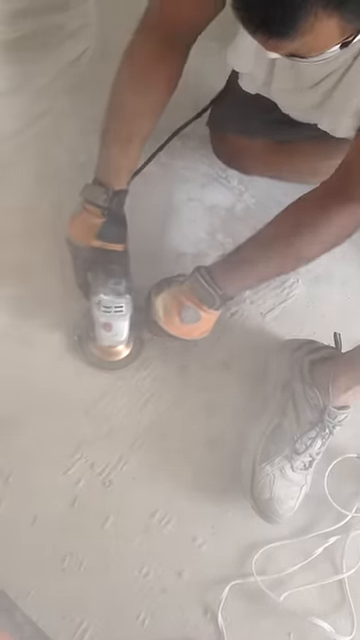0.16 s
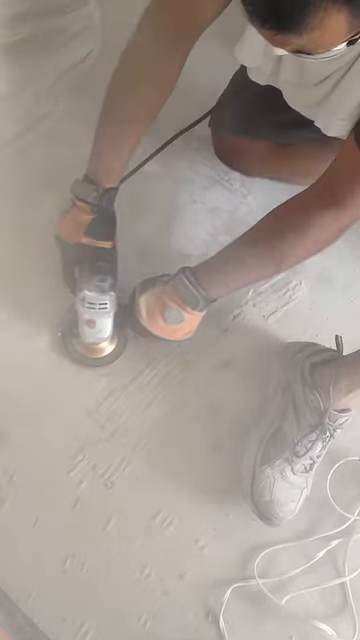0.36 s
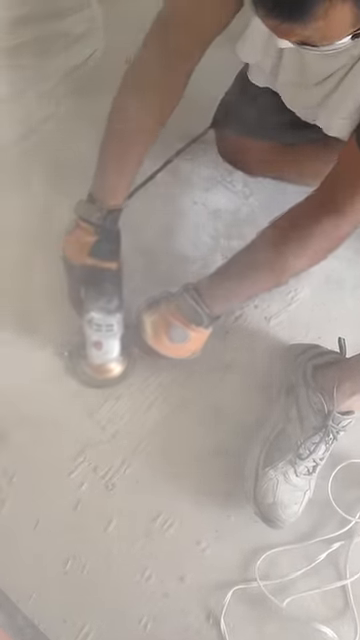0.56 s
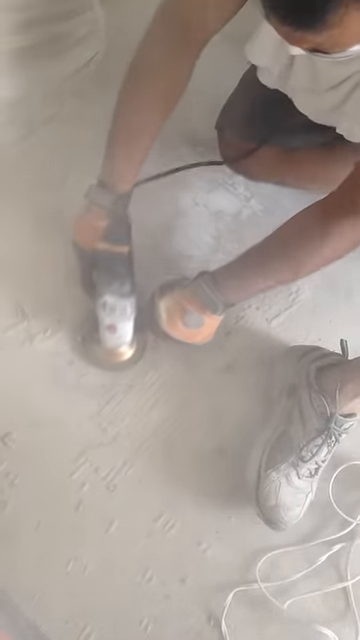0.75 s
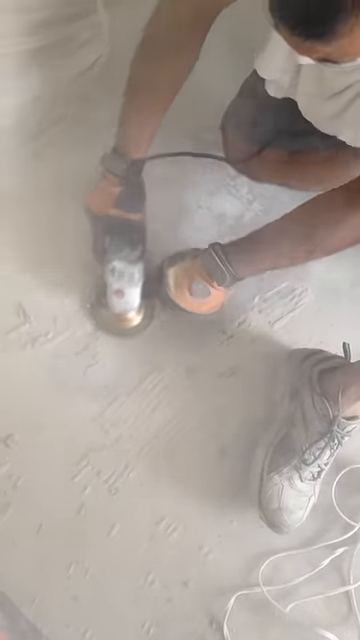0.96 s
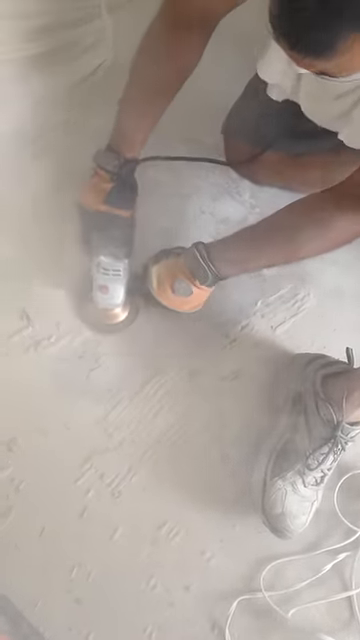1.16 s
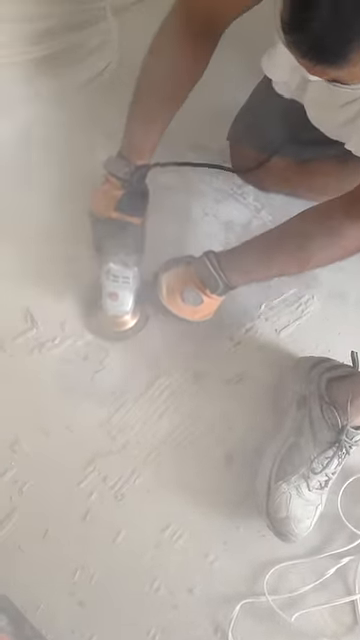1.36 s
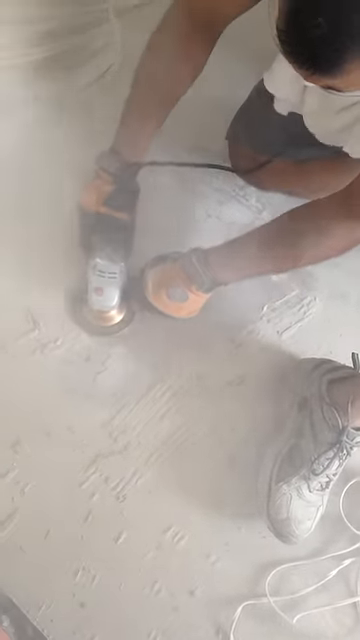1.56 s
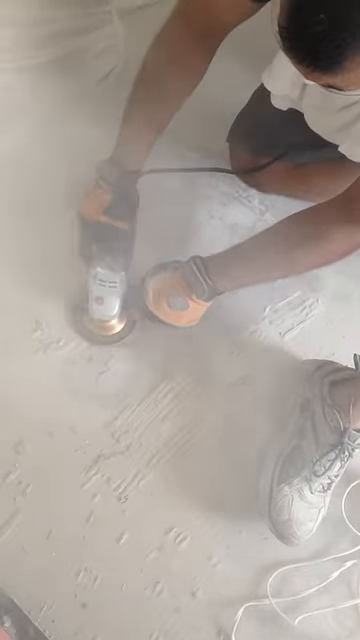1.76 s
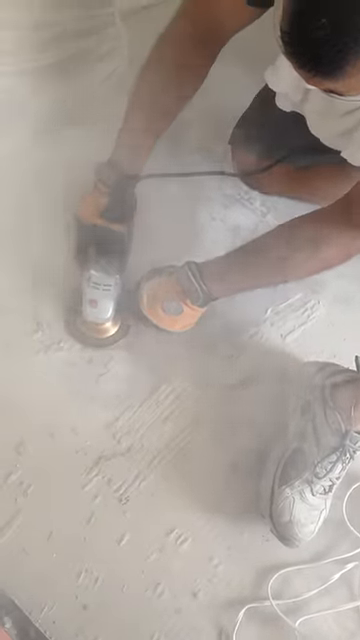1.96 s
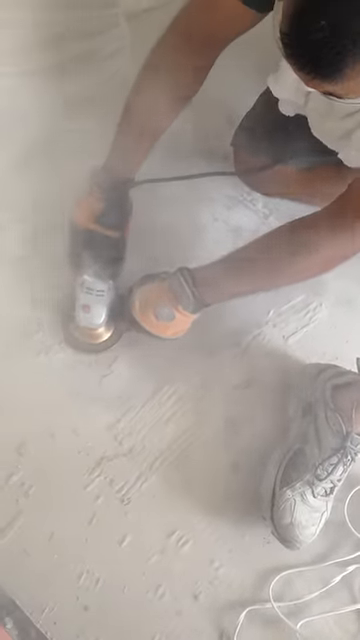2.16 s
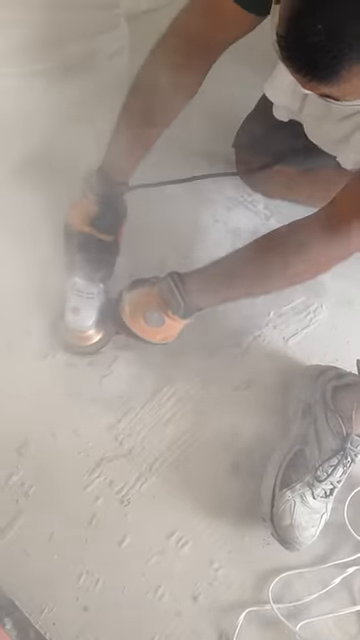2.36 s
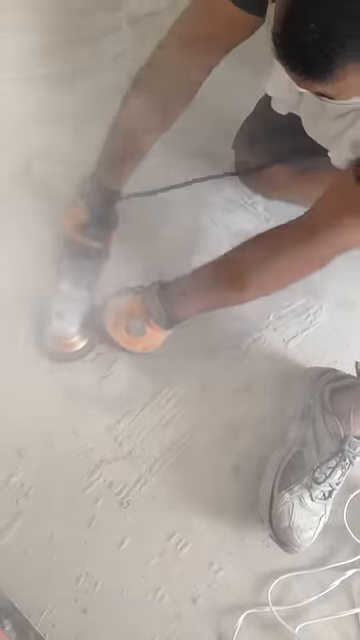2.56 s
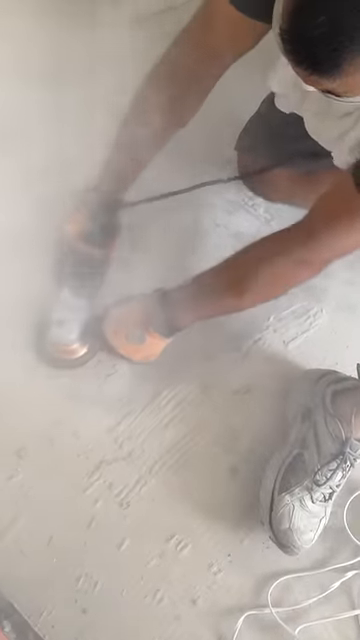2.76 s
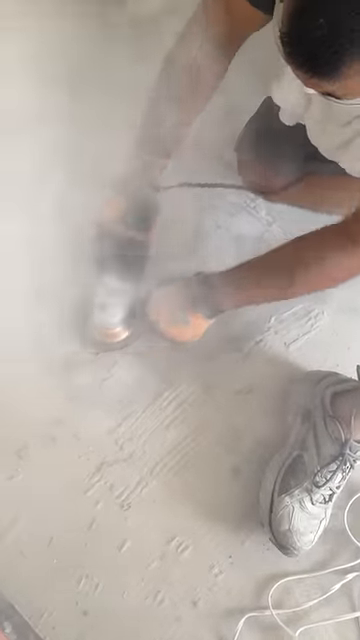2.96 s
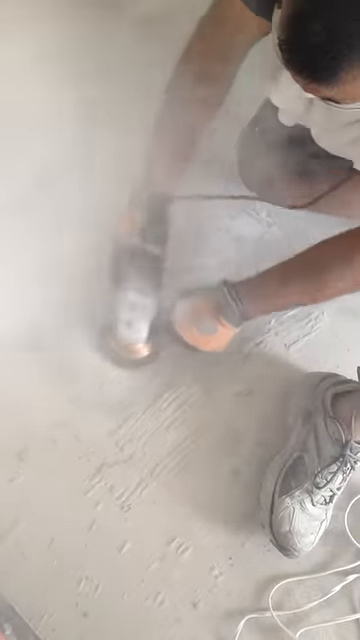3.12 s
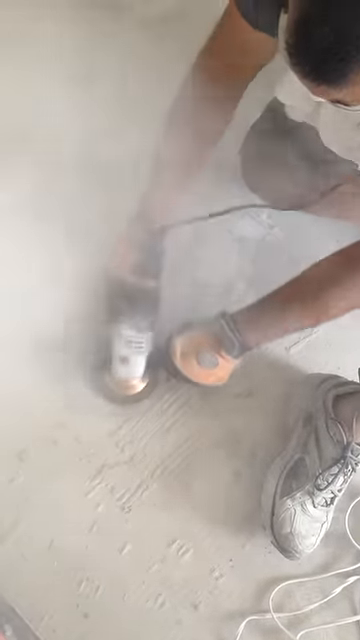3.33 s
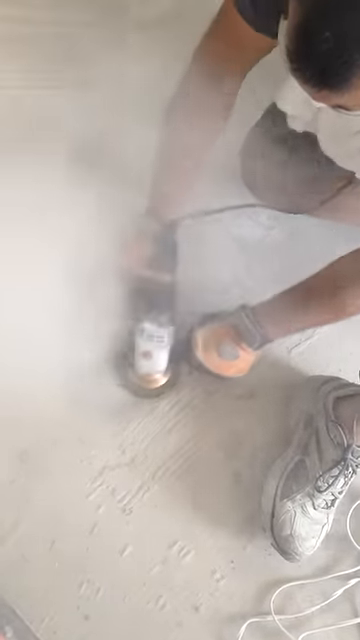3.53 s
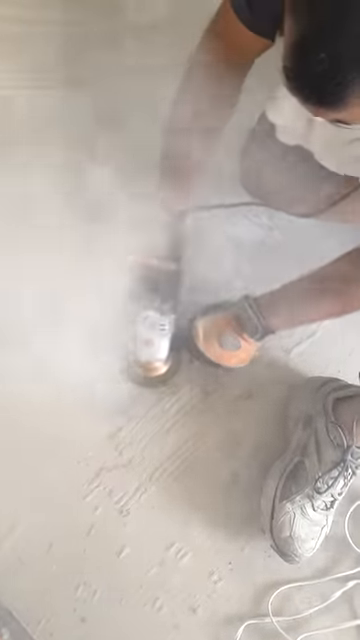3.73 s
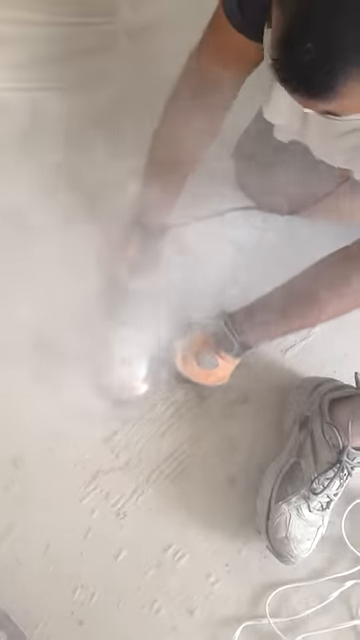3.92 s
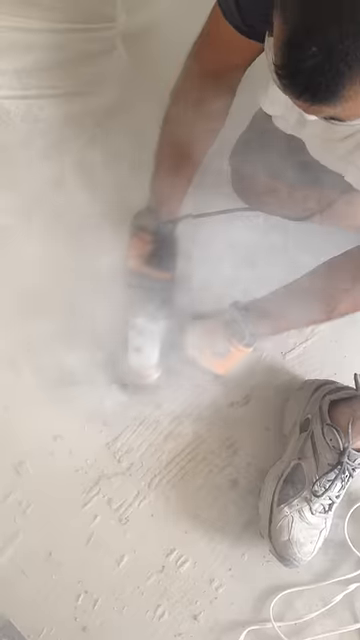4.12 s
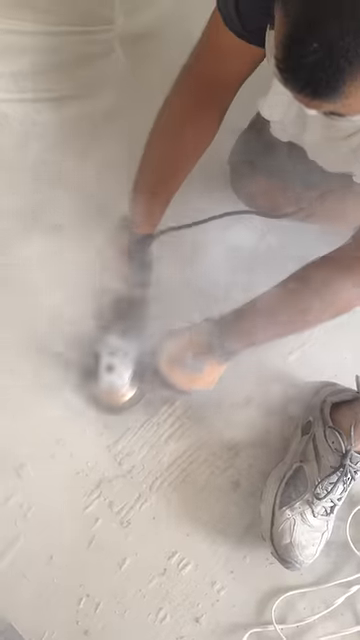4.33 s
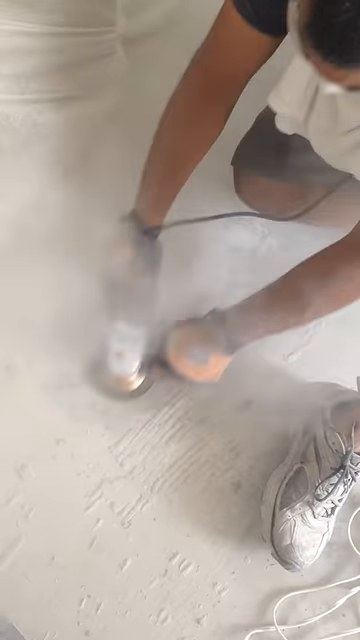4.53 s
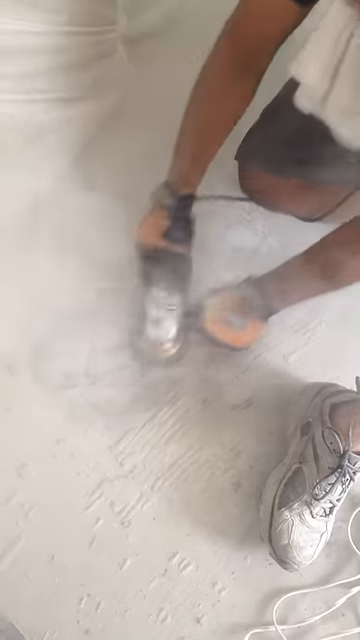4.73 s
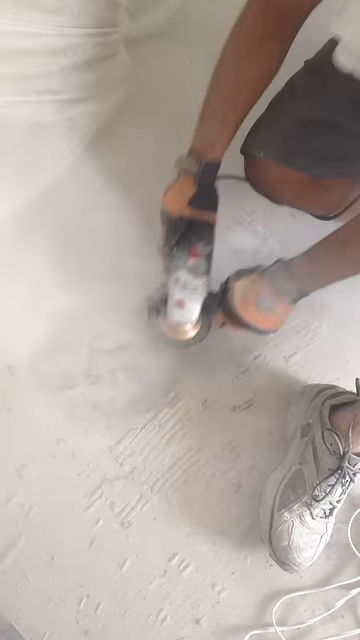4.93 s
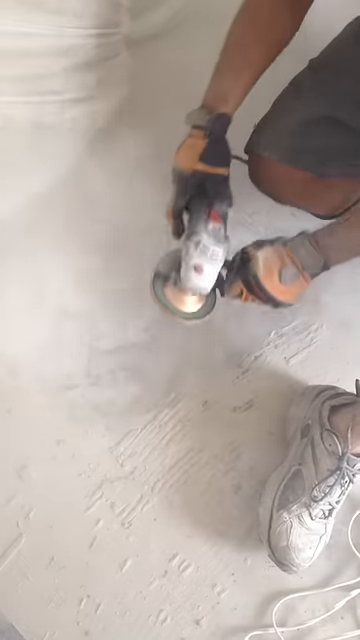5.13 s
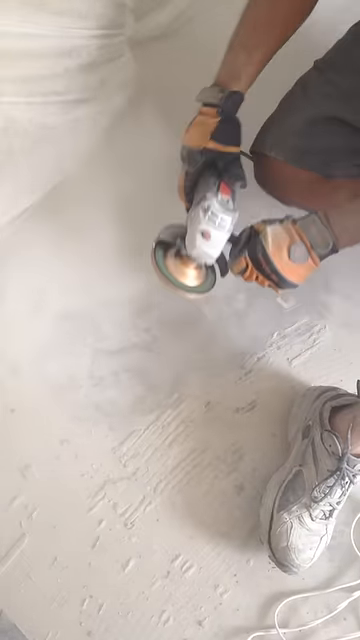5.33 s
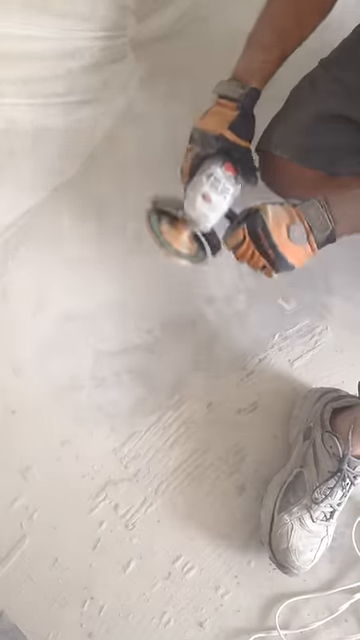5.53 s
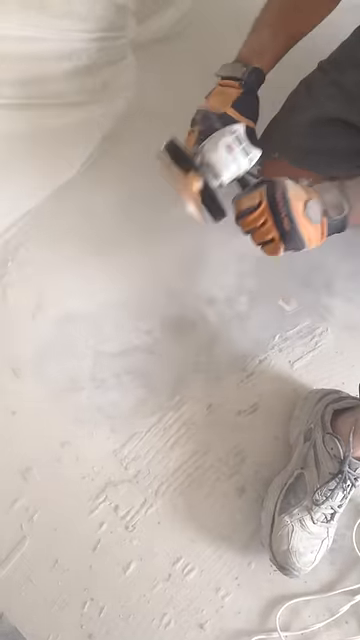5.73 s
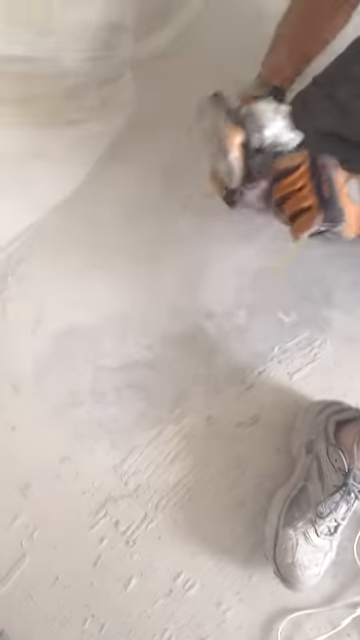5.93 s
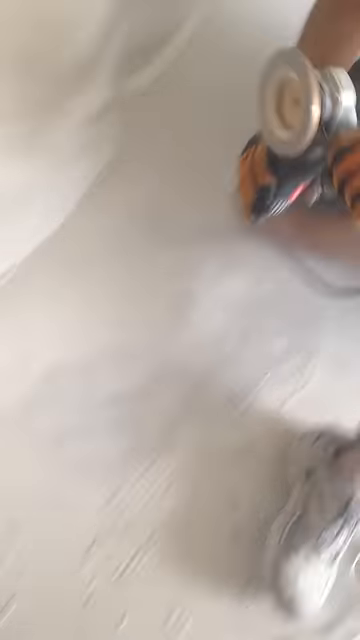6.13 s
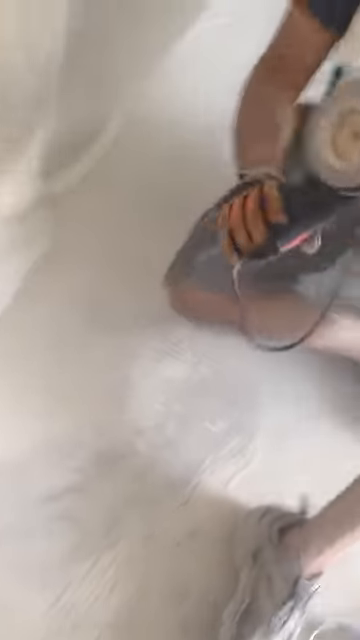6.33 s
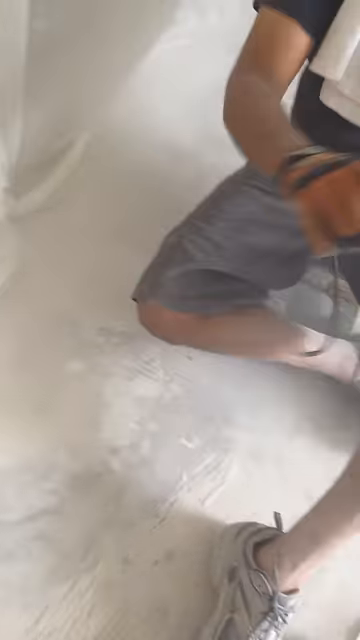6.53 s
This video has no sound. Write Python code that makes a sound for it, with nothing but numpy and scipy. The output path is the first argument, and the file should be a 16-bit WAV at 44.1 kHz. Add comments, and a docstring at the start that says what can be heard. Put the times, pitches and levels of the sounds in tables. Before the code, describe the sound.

An angle grinder rasps harshly over a concrete floor with ringing metallic squeals, then lifts off and winds down in a clattering, falling whine.

```python
"""An angle grinder works close to the microphone, scouring mortar off the concrete floor of a bare room.
Noisy grit impacts rasp under the diamond wheel and drive its modes, split by spin, and the housing's.
The steel guard sings along as a narrow resonance, with squeals. Lifted and switched off, the tool coasts:
a falling gear whine, fan air and a clattering rattle. Behind it a motor hums in sines over a low noise rumble."""
import sys
import numpy as np
from scipy import signal
from scipy.fft import rfft, irfft, next_fast_len
from scipy.io import wavfile
from scipy.ndimage import uniform_filter1d, map_coordinates

SR = 44100
rng = np.random.default_rng(int(sys.argv[2]) if len(sys.argv) > 2 else 0)


def unload_wav(signal):
    """Save mono or channel-first audio to the path in sys.argv[1] as 16-bit WAV at rate SR, clipped to [-1, 1]."""
    wavfile.write(
        sys.argv[1],
        SR,
        np.round(np.clip(np.atleast_2d(signal).T, -1, 1) * 32767).astype(np.int16),
    )


N = 294588
LIFT_S = 4.885  # the wheel leaves the floor


def amp(db):
    """Decibels to gain."""
    return 10 ** (np.asarray(db) / 20)


def unit(x):
    """Scale to rms 1."""
    return x / np.sqrt(np.mean(x ** 2) + 1e-20)


def along(points, hz):
    """Read (frequency [Hz], value) points on a log frequency axis."""
    f, v = np.transpose(points)
    return np.interp(np.log(hz + 1), np.log(f + 1), v)


def curves(rows):
    """One value per sample for each column after the time."""
    s, *cols = np.transpose(rows)
    return [np.interp(np.arange(N) / SR, s, c) for c in cols]


def wobble(rate):
    """A smooth random curve, rate knots a second."""
    knots = np.arange(0, N * rate / SR + 1, 1 / 8)
    smooth = map_coordinates(rng.standard_normal(int(N * rate / SR) + 4), [knots])
    return np.interp(np.arange(N) * rate / SR, knots, smooth)


def swells(rows):
    """Each (time [s], length [s], level [dB]) row swells and passes smoothly, in dB."""
    t = np.arange(N) / SR
    return sum(db * np.exp(-(2 * (t - s) / length) ** 2) for s, length, db in rows)


def angle(hz):
    """Running phase [rad] of a frequency curve."""
    return 2 * np.pi * np.cumsum(hz * np.ones(N)) / SR


def filtered(x, response):
    """Multiply the spectrum of x by a response of frequency."""
    m = next_fast_len(N + SR // 2)
    return irfft(rfft(x, m) * response(np.fft.rfftfreq(m, 1 / SR)), m)[:N]


def colour(x, spectrum):
    """Shape x by a spectrum, at rms 1."""
    return unit(filtered(x, lambda hz: amp(along(spectrum, hz))))


def mode(force, hz, width):
    """A resonance of fixed or moving pitch driven by a force, at rms 1."""
    turn = np.exp(1j * angle(hz))
    ring = force / turn  # the resonance sits at zero frequency here
    # a narrow pole, then one seven times as wide to steepen the skirts
    for pole_width in (abs(width), 7 * abs(width)):
        ring = signal.lfilter([1], [1, -np.exp(-np.pi * pole_width / SR)], ring)
    return unit((ring * turn).real)


def sustained(x, span=0.1):
    """Steady feeding of a mode: level changes slower than span [s] are evened out, fast flutter stays."""
    return x / np.sqrt(np.abs(uniform_filter1d(x ** 2, int(span * SR))) + 1e-6)


def lifted(fade=0.039):
    """0 while the wheel is on the floor, rising to 1 within fade [s] of the lift."""
    return np.clip((np.arange(N) / SR - LIFT_S) / fade, 0, 1)


def grit(spike_db, size=16):
    """Dense grain impacts: noise whose strength jumps at random every size samples."""
    strength = amp(spike_db * rng.standard_normal(N // size + 1))
    return rng.standard_normal(N) * np.repeat(strength, size)[:N]


def patchy(x, depth_db):
    """Each band swells and fades on its own."""
    z = signal.stft(x, nperseg=256)[2]
    field = rng.standard_normal(z.shape)
    field = uniform_filter1d(field, size=3, axis=0)
    field = uniform_filter1d(field, size=9, axis=1)
    return signal.istft(z * amp(depth_db * unit(field)), nperseg=256)[1][:N]


# speed of the other motor: (time [s], speed [turns/s])
MOTOR_SPEED = [(0, 79.5), (2, 78.5), (4.5, 79), (5.2, 79), (5.8, 80.5), (6.68, 81)]
# its hum: (multiple of the speed [1], level against the hum [dB])
HUM_LINES = [(1, -12), (2, -1.5), (3, -13), (4, -6)]
# low noise of the room: (frequency [Hz], density [dB per Hz])
RUMBLE_SPECTRUM = [(20, -24), (40, -12), (62, 3), (80, 3), (100, -4), (125, 0.5), (200, -8.5), (300, 2),
                   (420, -9), (900, -30), (3000, -60)]
# brief swells of the deep rumble: (time [s], length [s], rise [dB])
RUMBLE_SWELLS = [(.8, .2, 6), (3.23, .1, 14), (6.02, .22, 13), (6.48, .35, 13)]
HUM_DB, RUMBLE_DB = -41.5, -48  # mid levels, before their wobble
DEEP_DB, DEEP_HZ, DEEP_WIDTH_HZ = -58, 80, 25  # level between swells, centre and width


def background():
    """Another motor hums, wavering, as multiples of its speed over a low rumble whose deepest part swells."""
    speed, = curves(MOTOR_SPEED)
    turn = angle(speed + 0.27 * wobble(7))
    hum_db = HUM_DB + 1.4 * wobble(10)
    hum = np.zeros(N)
    for multiple, db in HUM_LINES:
        hum += amp(hum_db + db + 1.2 * wobble(9)) * np.sqrt(2) * np.sin(multiple * turn)
    rumble = amp(RUMBLE_DB + 2 * wobble(12)) * colour(rng.standard_normal(N), RUMBLE_SPECTRUM)
    deep_db = DEEP_DB + swells(RUMBLE_SWELLS)
    deep = amp(deep_db) * mode(rng.standard_normal(N), DEEP_HZ, DEEP_WIDTH_HZ)
    return hum + rumble + deep


# reverberation of the bare room: (frequency [Hz], time to fall 60 dB [s])
ROOM_DECAY = [(100, 0.27), (1000, 0.52), (5000, 0.69), (15000, 0.15)]


def room(x):
    """Bare walls answer with a decaying noise tail; it lasts longest near 5 kHz."""
    hz, t, z = signal.stft(rng.standard_normal(SR // 2), SR, nperseg=256)
    decay = amp(-60 * t / along(ROOM_DECAY, hz)[:, None])
    tail = signal.istft(z * decay, SR, nperseg=256)[1]
    delayed = np.pad(tail / np.linalg.norm(tail), (300, 0))  # 300 samples before the first echo
    return signal.fftconvolve(x, delayed)[:N]


# runs of rattling in the slack gears: (start [s], end [s], rate [clacks/s], level [dB])
RATTLE_RUNS = [(4.914, 5.355, 46, -16), (5.37, 5.81, 41.7, -15.5), (5.824, 6.39, 39.1, -14),
               (6.419, 6.47, 26.1, -14), (6.497, 6.68, 42.7, -15)]
# the hardest knocks of the gears: (time [s], peak [dB])
KNOCKS = [(5.42, -11.5), (5.594, -10), (5.796, -11), (5.876, -9), (5.93, -10.5), (6.053, -10),
          (6.134, -8.5), (6.184, -8), (6.358, -9.5), (6.42, -12), (6.459, -8), (6.495, -11)]


def clacks(rise=.0028, decay=.003, jitter=.001, scatter_db=1.6):
    """Force of the slack gears: runs of nearly even clacks, with a few hard knocks among them."""
    t = np.arange(SR // 10) / SR
    burst = (1 - np.exp(-t / rise)) ** 2 * np.exp(-t / decay)
    runs = np.array([(s, db) for start, end, rate, db in RATTLE_RUNS
                     for s in np.arange(start, end, 1 / rate)])
    runs = runs + rng.standard_normal(runs.shape) * [jitter, scatter_db]
    blows = np.zeros(N + SR)
    for s, db in [*runs, *KNOCKS]:
        at = round(s * SR) + np.arange(len(t))
        blows[at] = np.maximum(blows[at], amp(db) * burst / burst.max())
    return blows[:N]


# falling gear whine of the coasting tool: (time [s], frequency [Hz])
WHINE_PITCH = [(4.85, 2560), (5.05, 2500), (5.3, 2410), (5.6, 2330), (5.9, 2203), (6.2, 2180), (6.45, 2025),
               (6.68, 1983)]
# steel resonances rung by the rattle: (frequency [Hz], width [Hz], relative level [dB])
STEEL_MODES = [(1970, 210, -10.5), (2830, 190, -17.5), (3635, 110, -7.5), (4080, 190, -3.5),
               (4600, 330, -15), (4890, 40, -19), (5890, 40, -15), (6000, 27, -13), (7600, 110, -8.5),
               (9950, 54, -15), (13230, 300, -8.5)]
# broad noise of the clacks: (frequency [Hz], density [dB per Hz])
CLACK_SPECTRUM = [(300, -28), (1500, -35), (2000, -1.5), (3000, 1.5), (4200, 2), (5500, 2.5), (6700, -0.5),
                  (7900, 2), (10500, -8), (15000, -27)]
# air drawn by the fan: (frequency [Hz], density [dB per Hz])
AIR_SPECTRUM = [(300, -13.5), (500, -6), (1000, -5.5), (1550, -5.5), (2000, 0.5), (3000, 1), (4400, 1),
                (5500, 0.5), (7800, 2), (10500, -8), (13300, 0), (14500, -23), (15300, -0.5)]
WHINE_DB, AIR_DB = -35, -29.2  # whine before its wobble; air


def coasting():
    """Fan air and a falling gear whine, with the slack gears clattering against the steel."""
    whine_hz, = curves(WHINE_PITCH)
    whine_db = WHINE_DB + 1.7 * wobble(6.2)
    blows = clacks()
    # every clack lands a little differently and brings out other resonances
    force = blows * patchy(grit(spike_db=2.5), depth_db=3.0)
    steel = sum(amp(db) * mode(force, hz, width) for hz, width, db in STEEL_MODES)
    clatter = amp(-9.5) * colour(force, CLACK_SPECTRUM) + amp(-11.5) * steel
    rattle = np.sqrt(np.mean(blows ** 2)) * clatter
    # the teeth mesh hardest at each clack; their overtone grows as the wheel slows
    mesh = rng.standard_normal(N) * (0.024 + blows)
    slowed = 1 - whine_hz / whine_hz[0]
    whine = amp(whine_db) * sustained(mode(mesh, whine_hz, 86))
    overtone = amp(whine_db - 12 + 63 * slowed) * sustained(mode(mesh, 2 * whine_hz, 200))
    # the steel guard sings faintly near 5 kHz, less as the wheel slows
    singing = amp(-35.0 - 50 * slowed) * mode(rng.standard_normal(N), 4955, 24)
    air = amp(AIR_DB) * colour(patchy(grit(spike_db=1.5), depth_db=2.0), AIR_SPECTRUM)
    return rattle + (whine + overtone + singing + air) * lifted(fade=0.021)


# squeals of the wheel or the guard: (start [s], length [s], voice, level [dB])
SQUEALS = [(0.0, 0.074, "upper", -21.5), (0.0, 0.3, "trail", -25), (0.055, .1, "lead", -19),
           (0.223, .16, "lead", -24.5), (.28, .09, "guard", -18), (0.681, 0.061, "guard", -15),
           (0.685, 0.28, "trail", -26), (.94, 0.054, "lead", -19.5), (1.03, 0.2, "guard", -23),
           (1.05, .1, "top", -35), (1.11, 0.14, "lead", -25), (1.296, 0.055, "guard", -14.5),
           (1.33, .06, "lead", -25), (1.475, 0.25, "lead", -23.5), (1.541, .07, "guard", -18),
           (1.712, .06, "upper", -22.5), (1.81, 0.11, "lead", -24), (1.9, 0.056, "guard", -25),
           (2.098, 0.18, "upper", -21.5), (2.12, 0.13, "guard", -21.5), (2.138, 0.074, "lead", -26),
           (2.452, 0.033, "guard", -20), (2.491, 0.061, "lead", -17), (2.635, 0.056, "lead", -15.5),
           (2.759, 0.092, "lead", -16.5), (2.77, .08, "upper", -23.5), (2.858, 0.043, "guard", -20.5),
           (3.098, 0.067, "lead", -27.5), (3.169, 0.32, "upper", -24), (3.176, .13, "guard", -24.5),
           (3.28, .08, "lead", -23.5), (3.631, 0.086, "lead", -20), (3.79, 0.15, "lead", -24),
           (3.734, .05, "guard", -19), (3.793, 0.13, "trail", -23), (3.802, 0.044, "upper", -23.5),
           (3.99, .04, "lead", -24), (4.058, 0.066, "lead", -18), (4.17, 0.044, "upper", -23.5),
           (4.361, 0.041, "upper", -23), (4.6, 0.19, "top", -35), (4.65, 0.12, "upper", -21.5),
           (4.66, 0.09, "trail", -22), (5.865, 0.026, "guard", -23), (6.62, 0.068, "guard", -32)]
SQUEAL_ATTACK_S, SQUEAL_RELEASE_S = 0.0055, 0.013


def squeal(voice):
    """Gain of one voice when friction catches it: attack, hold, release."""
    t = np.arange(N) / SR
    gain = np.zeros(N)
    for start, length, name, db in SQUEALS:
        if name == voice:
            attack = 1 - np.exp(-np.maximum(t - start, 0) / SQUEAL_ATTACK_S)
            release = np.exp(-np.maximum(t - start - length, 0) / SQUEAL_RELEASE_S)
            gain += amp(db) * attack * release
    return gain


# base ringing between squeals, for wheel voices and guard: voice -> level [dB]
SINGING = {"lead": -31.5, "trail": -32, "upper": -30, "top": -36.5, "guard": -23.5}
# the wheel bites into a lump (+) or skips (-): (time [s], length [s], level change [dB])
JOLTS = [(0.315, 0.034, 2), (1.003, 0.068, -3), (1.318, 0.037, 0.5), (1.419, 0.056, -7),
         (2.002, 0.053, -2.5), (2.328, 0.048, -5), (3.727, 0.037, -1), (3.807, 0.026, 6), (3.93, .04, -2.5),
         (4.0, .05, 2.5), (4.06, .035, -5), (4.629, 0.058, 3)]
GUARD_EASE_DB_PER_S, GUARD_FADE_DB_PER_S = 0.85, 10.5  # throughout, and added once the wheel is free


def guard():
    """The steel guard rings unevenly at one mode, ever less as the wheel grinds, and fades as it coasts."""
    t = np.arange(N) / SR
    ring_db = SINGING["guard"] - GUARD_EASE_DB_PER_S * t
    ring_db -= GUARD_FADE_DB_PER_S * np.maximum(t - LIFT_S, 0)
    ring_db += 0.42 * swells(JOLTS) + 2 * wobble(22.03)
    gain = np.hypot(amp(ring_db), squeal("guard"))
    force = grit(spike_db=0.5) * amp(3.8 * wobble(80))
    flutter_db = (2.0 + 1.5 * lifted()) * wobble(90)
    return gain * amp(flutter_db - 1.96) * sustained(mode(force, 3604, 44), span=0.04)


# travelling waves of the wheel: (frequency at rest [Hz], signed nodal diameters [1], voice)
WHEEL_WAVES = [(5197, 3, "lead"), (5204, -3, "trail"), (8662, 4, "upper"), (8655, -4, "upper"),
               (8768, 4, "upper"), (8758, -4, "upper"), (12892, 5, "top"), (12892, -5, "top")]
# how each of these waves rings, in the same order: (width [Hz], relative level [dB])
WAVE_RING = [(20, 0), (24, .5), (20, -1.5), (22, -6.5), (22, -6), (26, -8.5), (32, -2.5), (32, -.5)]


def wheel_ring(speed, chatter, drive_db):
    """Spin carries each mode round: waves running with and against it shift by diameters times speed."""
    gain = {}
    for voice in ("lead", "trail", "upper", "top"):
        ring_db = SINGING[voice] + drive_db + 1.74 * wobble(16)
        gain[voice] = np.hypot(amp(ring_db), squeal(voice))
    force = grit(spike_db=5.5) * chatter
    out = np.zeros(N)
    for (hz, diameters, voice), (width, db) in zip(WHEEL_WAVES, WAVE_RING):
        wave = sustained(mode(force, hz + diameters * speed, width), span=0.028)
        # the ring catches and lets go in short beads
        out += gain[voice] * amp(db + 2.16 * wobble(70)) * wave
    # once free, the wheel rings on for a moment
    return out * (1 - lifted(fade=0.083))


def rim(turn, count=22):
    """The uneven rim repeats its bumps every turn; their pattern drifts as the wheel is tilted."""
    return sum(wobble(9) * np.sin(k * turn + rng.uniform(0, 2 * np.pi)) for k in range(3, count))


# wheel speed under load: (time [s], speed [turns/s])
WHEEL_SPEED = [(0, 77), (.2, 84.5), (.45, 69), (.8, 55), (1.0, 59), (1.3, 72), (1.6, 76.6), (1.9, 76.6),
               (2.2, 88.4), (2.5, 87.5), (2.75, 77.7), (3.12, 83), (3.35, 77), (3.7, 62), (4.0, 61.5),
               (4.3, 62), (4.7, 64.4), (5.0, 63)]
# how hard the wheel is pressed on the floor: (time [s], level [dB])
PRESSURE = [(0, -34), (.55, -36), (1.0, -35.5), (1.35, -35.5), (1.75, -33), (2.3, -33), (2.6, -33.5),
            (3.15, -32), (3.55, -32.5), (4.0, -35), (4.4, -32.5), (4.65, -29.5), (4.78, -33.5), (4.88, -32)]
# treble hiss before jolts and wobble: (time [s], level [dB])
TREBLE = [(.06, -21.5), (.25, -27), (.55, -30.5), (.86, -23.5), (1.05, -27.5), (1.5, -29.5), (1.8, -25),
          (2.45, -22), (3.15, -25), (3.29, -22), (3.5, -25.5), (4.1, -29.5), (4.25, -25.5), (4.7, -25),
          (4.88, -29)]
# where the rim scrapes: (time [s], resonance [Hz], level against the rasp [dB])
SCRAPE = [(0, 2730, -8), (.6, 1960, -12), (1.0, 2500, -4.5), (1.8, 2477, -6), (2.1, 2390, -10),
          (2.35, 2360, -5.5), (2.55, 2540, -4.5), (2.85, 2577, -23), (3.15, 2720, -1), (3.5, 2803, -6.5),
          (4.1, 2010, -12), (4.5, 2000, -11), (4.9, 2524, -10)]
# fixed resonances of the tool while it grinds: (frequency [Hz], width [Hz], level against the rasp [dB])
HOUSING_MODES = [(359, 14, -23), (566, 14, -24), (634, 16, -20.5), (712, 18, -22.5), (775, 16, -25),
                 (932, 40, -20), (1324, 20, -17), (2510, 50, -12.5), (2790, 40, -16.5), (4100, 200, -11),
                 (4830, 140, -12), (4955, 25, -13), (7590, 140, -13), (9680, 40, -13), (9925, 50, -11.5)]
# low crunch of the grit: (frequency [Hz], density [dB per Hz])
CRUNCH_SPECTRUM = [(100, -20), (220, -4.5), (330, 2), (480, -3), (650, -0.5), (1000, 3), (1500, 3),
                   (1900, 3), (2600, -11), (5000, -60)]
# middle rasp of the grit: (frequency [Hz], density [dB per Hz])
RASP_SPECTRUM = [(1000, -44), (1600, -12), (2000, -2), (2500, -2.5), (3200, -1), (4000, 1), (4700, -3.5),
                 (5500, -4), (6500, -9), (9000, -19.5)]
# treble hiss of the grit: (frequency [Hz], density [dB per Hz])
HISS_SPECTRUM = [(3000, -30), (5000, 5), (6000, 0), (7000, -2), (8100, 1), (9700, 4.5), (10500, -10),
                 (11500, -13.5), (12300, -3.5), (13600, -10), (15000, -4.5)]
RASP_DB, RASP_FOLLOWS = -25, 0.24  # base level of the rasp, and its dB per dB of pressure
SHAKE_DB, SHAKE_DB_PER_TURN = -43, 0.3  # unbalance at top speed, and its loss per turn/s below that
# drone of the diamond segments: level at full pressure and top speed, dB per dB of pressure,
# and loss in dB per turn/s below top speed
SEGMENTS_PER_TURN = 16.6
SEGMENTS_DB, SEGMENTS_FOLLOW, SEGMENTS_DB_PER_TURN = -37, 1.8, .5
RING_FOLLOWS_TREBLE = 0.53  # dB of wheel ringing per dB of hiss
HOUSING_FOLLOWS_HZ = 900  # modes up to this pitch follow pressure fully, higher ones less


def grinding():
    """The wheel bites once a turn, chatters, and throbs with the mains torque; grit rings wheel and housing."""
    speed, = curves(WHEEL_SPEED)
    pressure_db, = curves(PRESSURE)
    treble_db, = curves(TREBLE)
    scrape_hz, scrape_db = curves(SCRAPE)
    jolt_db = swells(JOLTS) + .5 * wobble(23.98)
    harder_db = pressure_db - pressure_db.mean()
    below_top = speed.max() - speed

    # level of each layer
    crunch_db = pressure_db + jolt_db
    rasp_db = RASP_DB + RASP_FOLLOWS * harder_db + 0.69 * jolt_db
    hiss_db = treble_db + 0.5 * jolt_db + 0.83 * wobble(14)
    ring_db = RING_FOLLOWS_TREBLE * (treble_db - treble_db.mean()) + 0.66 * jolt_db
    shake_db = SHAKE_DB - SHAKE_DB_PER_TURN * below_top
    segments_db = SEGMENTS_DB + SEGMENTS_FOLLOW * (pressure_db - pressure_db.max())
    segments_db -= SEGMENTS_DB_PER_TURN * below_top

    # the bite of each turn and the 120 Hz torque of the mains
    turn = angle(speed) + .15 * wobble(25)
    bite = np.cos(turn) + 0.5 * np.cos(2 * turn) + 0.19 * np.cos(3 * turn)
    throb_db = 1.3 * bite + 1.0 * np.cos(angle(120))
    press = amp(throb_db + 0.45 * wobble(70) + 0.45 * wobble(250))
    chatter = press * amp(4.4 * wobble(60))

    # layers made where the wheel meets the floor
    crushed = patchy(grit(spike_db=4.5), depth_db=2.0) * press * amp(2.5 * bite)
    crunch = amp(crunch_db - 2) * colour(crushed, CRUNCH_SPECTRUM)
    bumps = amp(crunch_db - 7.5) * colour(rim(turn), CRUNCH_SPECTRUM)
    rasped = patchy(grit(spike_db=3.5), depth_db=2.0) * press
    rasp = amp(rasp_db + 1.4) * colour(rasped, RASP_SPECTRUM)
    scraped = grit(spike_db=3.5) * press * amp(3.4 * wobble(45))
    scrape = amp(rasp_db + scrape_db + 0.7) * mode(scraped, scrape_hz, 187)
    segments = amp(segments_db) * mode(grit(spike_db=4) * press, SEGMENTS_PER_TURN * speed, 130)
    hissed = patchy(grit(spike_db=2.5), depth_db=2.5) * press
    hiss = amp(hiss_db) * colour(hissed, HISS_SPECTRUM)
    on_floor = (crunch + bumps + segments + rasp + scrape + hiss) * (1 - lifted(fade=0.028))

    # the body of the tool, and its unbalance at twice the wheel speed
    force = grit(spike_db=4.5) * chatter
    housing = np.zeros(N)
    for hz, width, db in HOUSING_MODES:
        follow = min(1, HOUSING_FOLLOWS_HZ / hz)
        housing += amp(rasp_db + db + harder_db * follow) * mode(force, hz, width)
    shake = amp(shake_db) * np.sqrt(2) * np.sin(2 * turn)
    body = (housing + shake) * (1 - lifted(fade=0.091))
    return on_floor + body + wheel_ring(speed, chatter, ring_db)


def scene():
    """The tool close by, its echo off the bare walls, and the hum of the room behind."""
    tool = grinding() + guard() + coasting()
    return (tool + amp(-9.0) * room(tool) + background())[None]


def record(dry):
    """The microphone keeps nothing from 15.3 kHz up."""
    return filtered(dry[0], lambda hz: hz < 15300)[None]


dry = scene()
out = record(dry)
unload_wav(out)
```